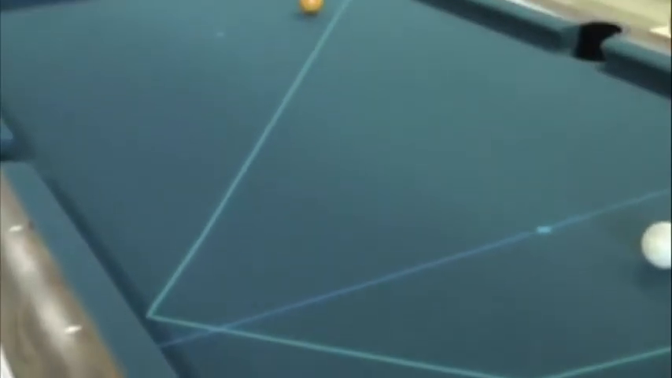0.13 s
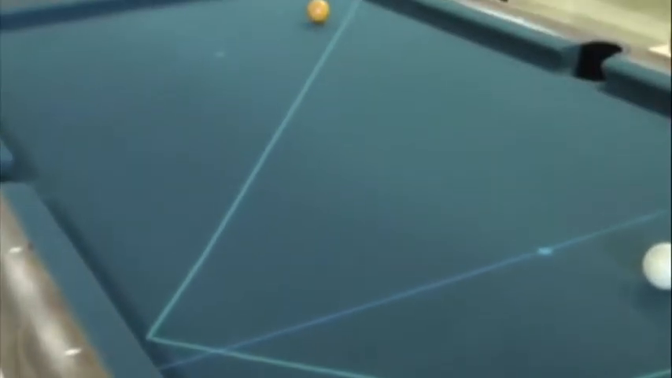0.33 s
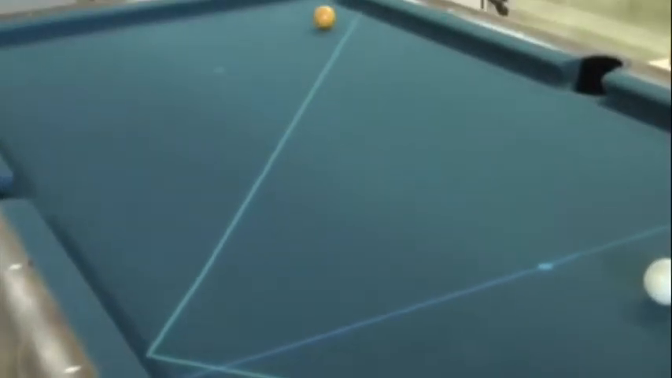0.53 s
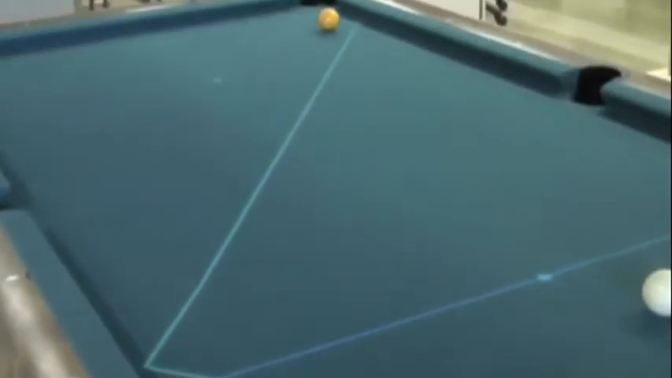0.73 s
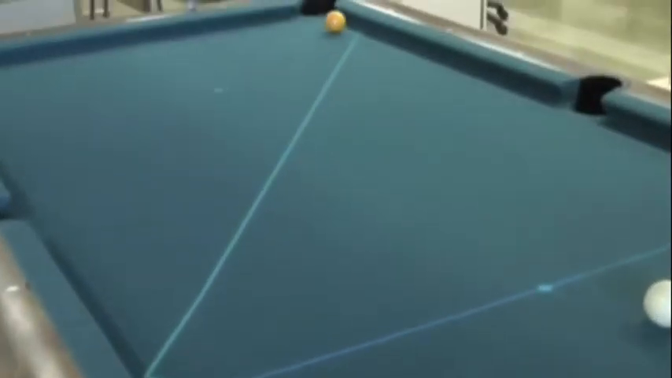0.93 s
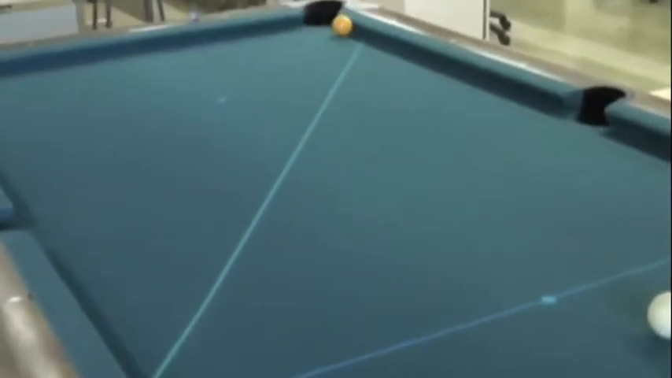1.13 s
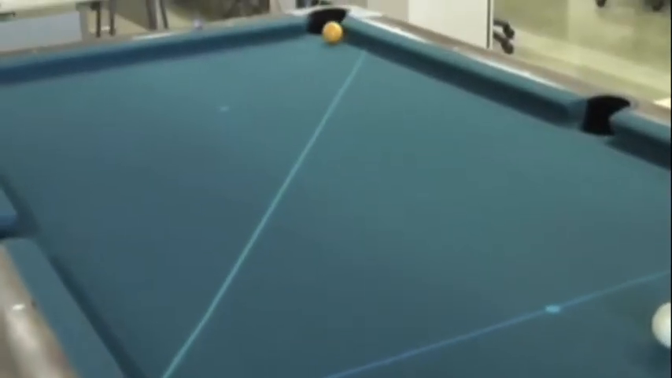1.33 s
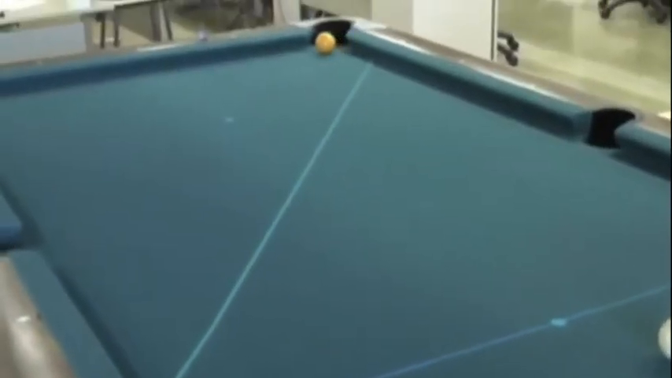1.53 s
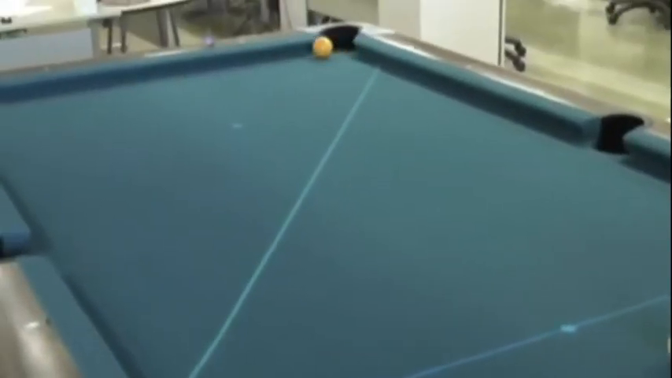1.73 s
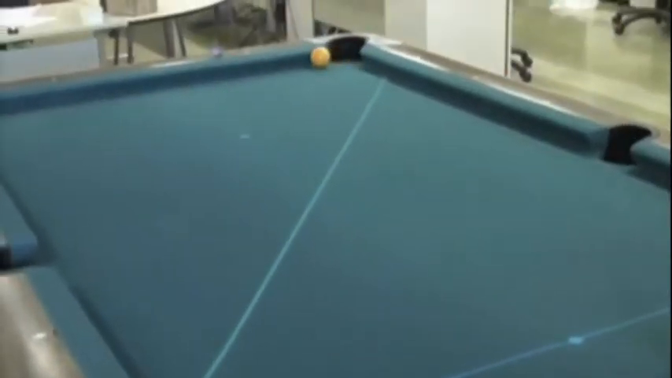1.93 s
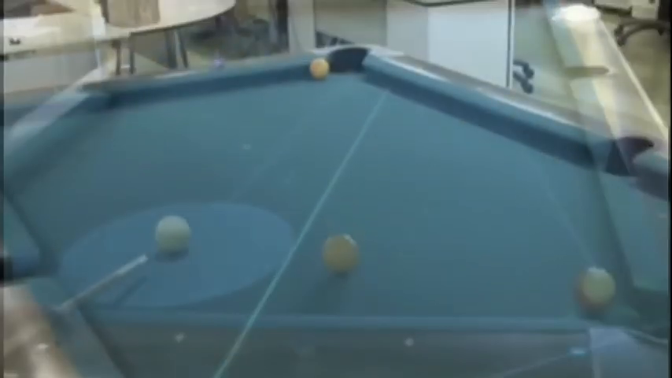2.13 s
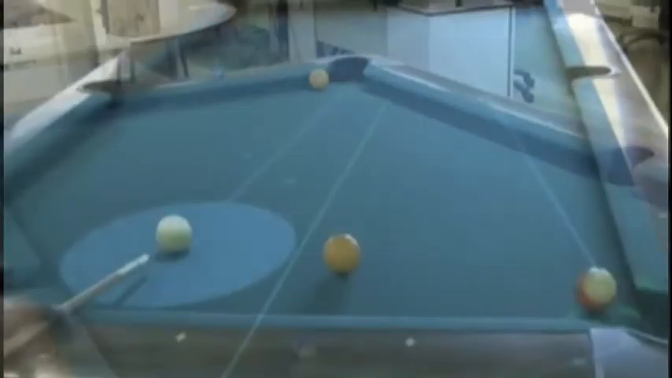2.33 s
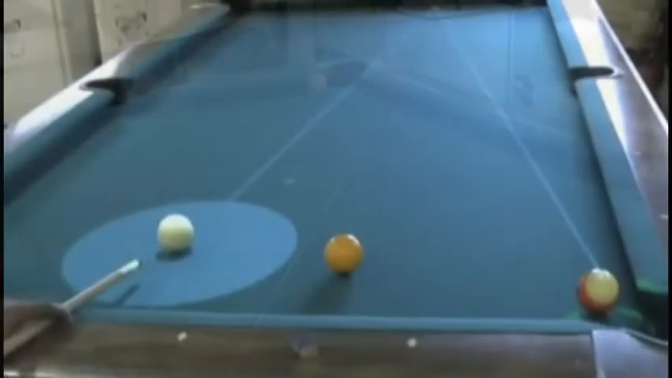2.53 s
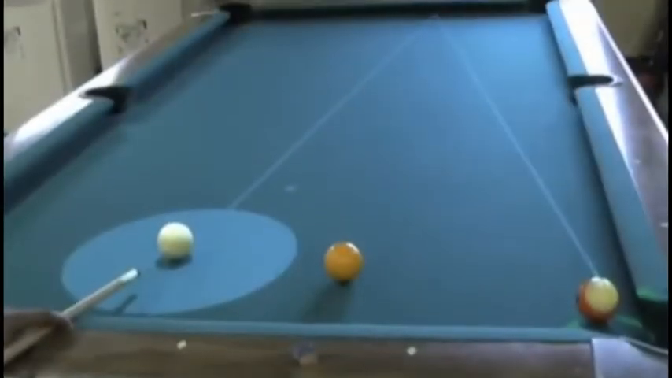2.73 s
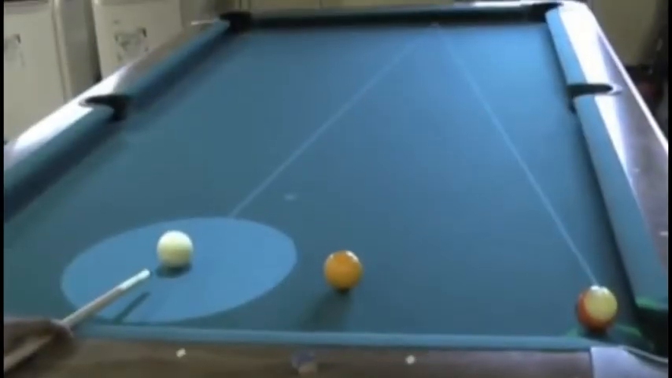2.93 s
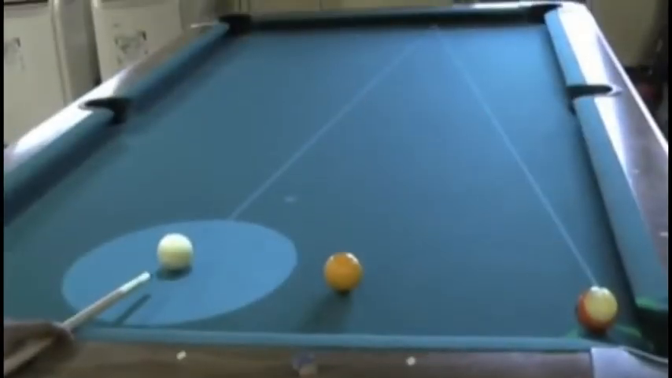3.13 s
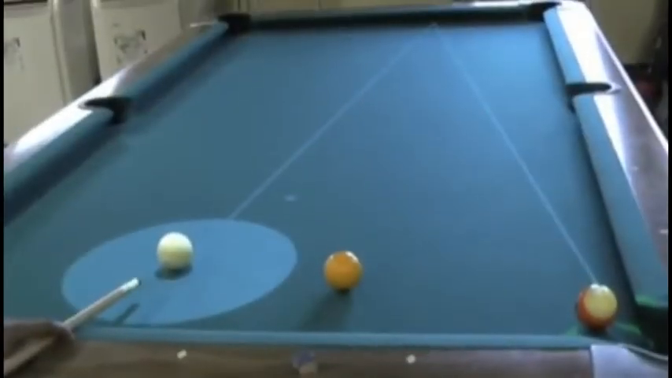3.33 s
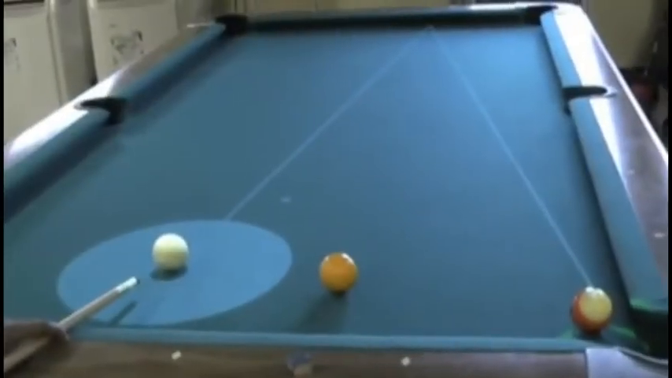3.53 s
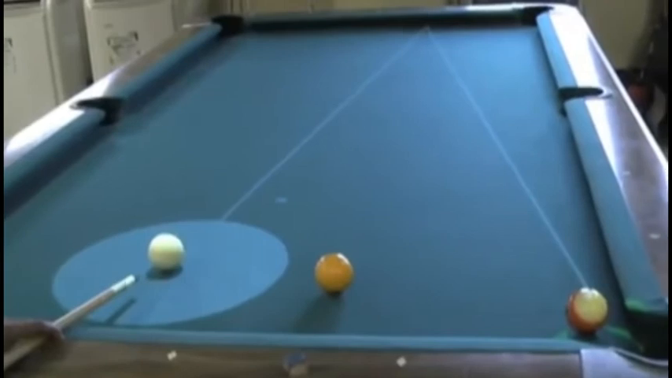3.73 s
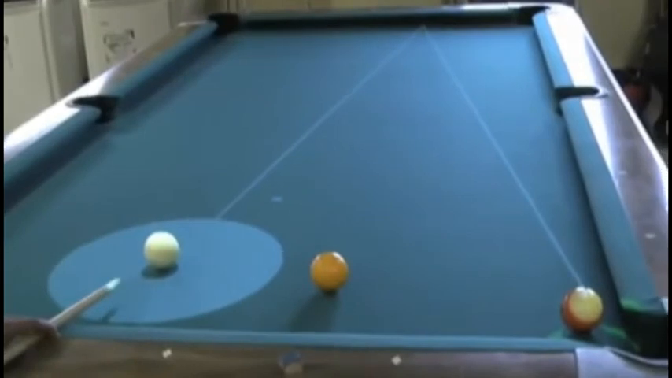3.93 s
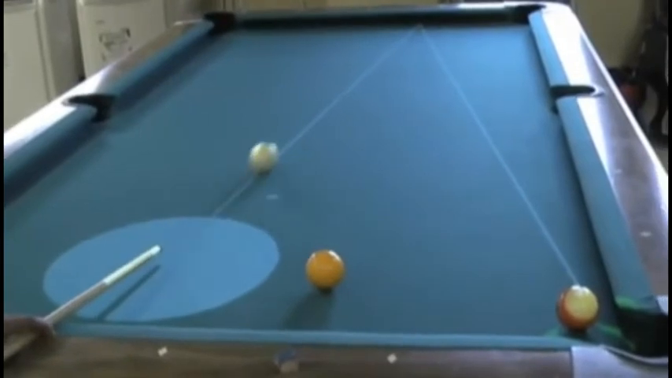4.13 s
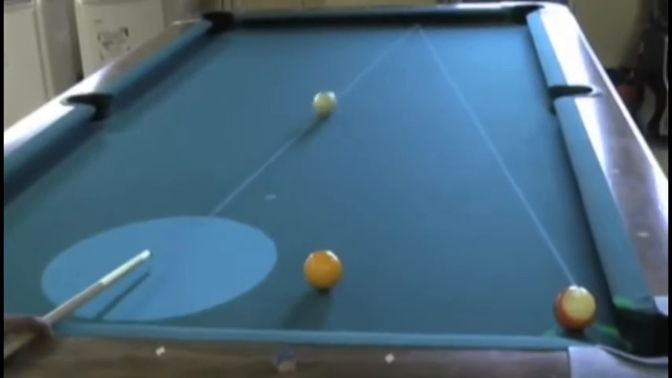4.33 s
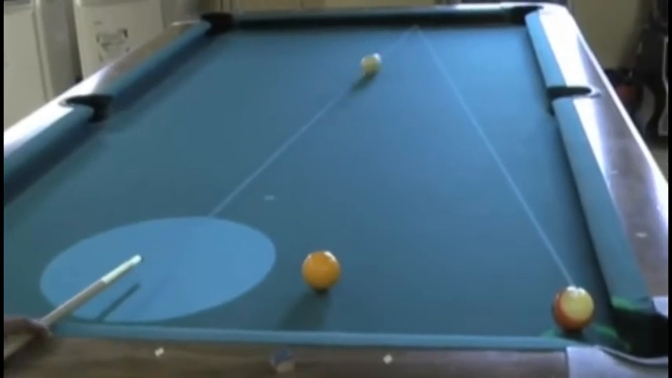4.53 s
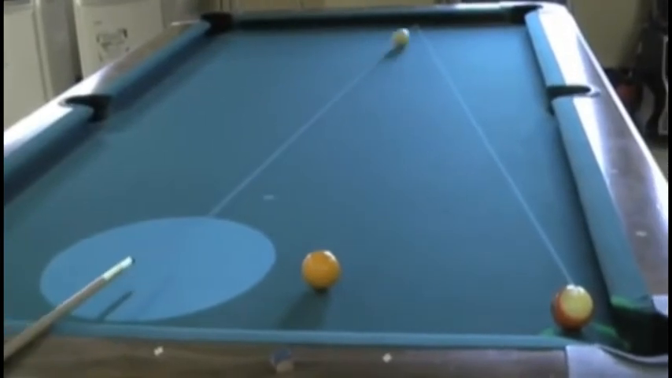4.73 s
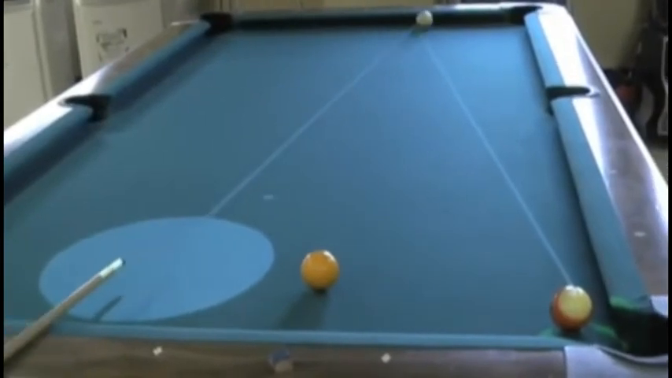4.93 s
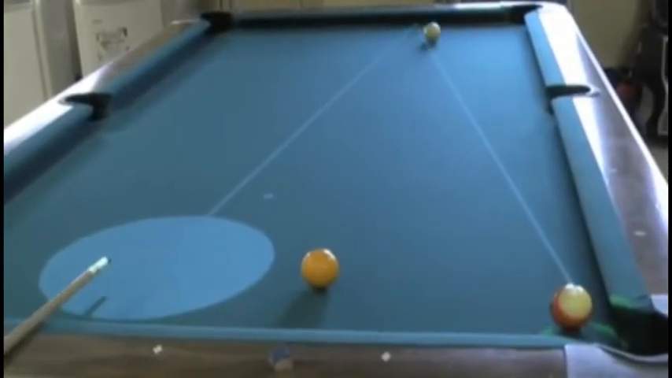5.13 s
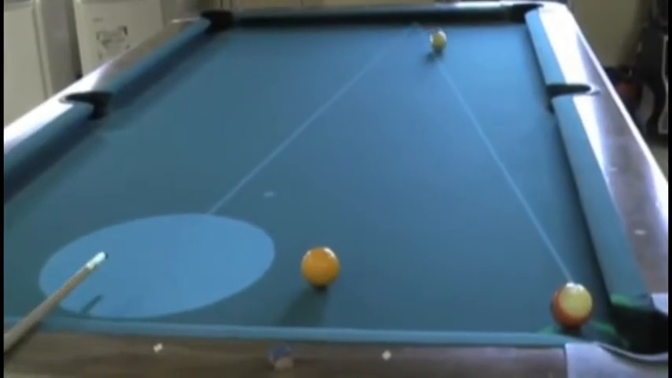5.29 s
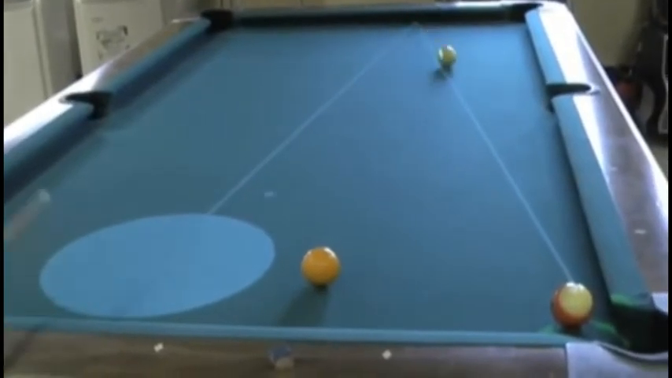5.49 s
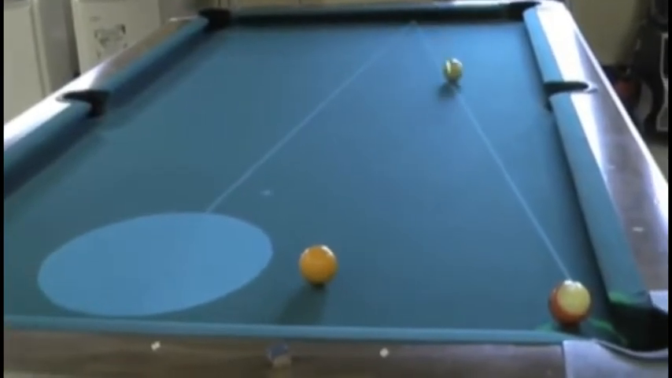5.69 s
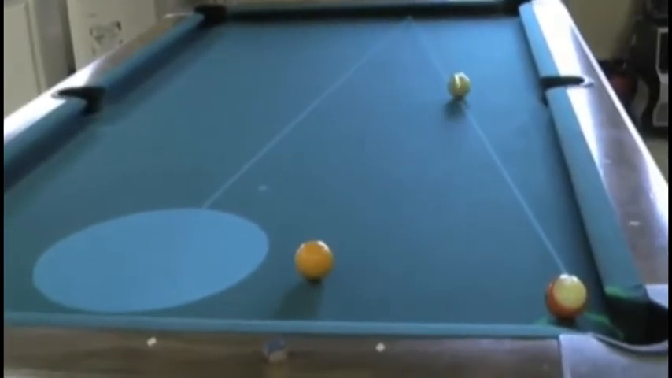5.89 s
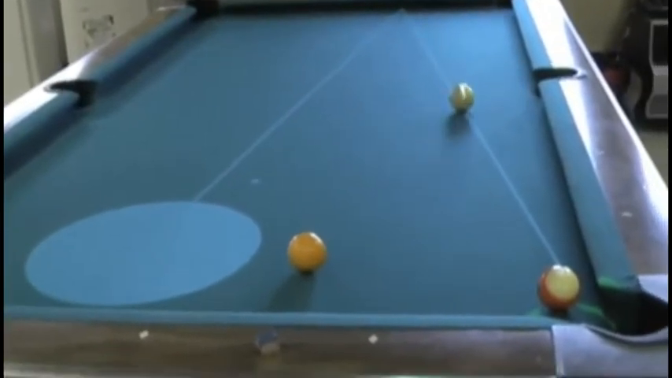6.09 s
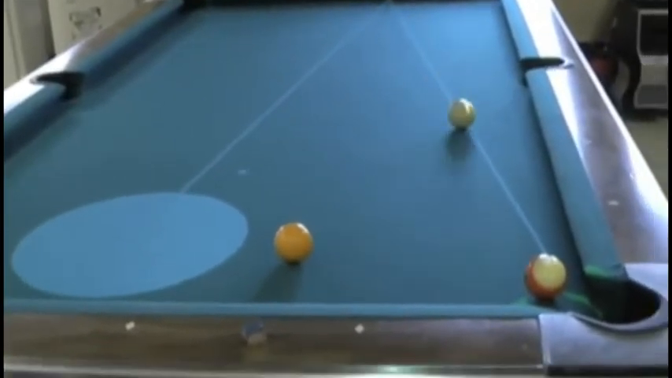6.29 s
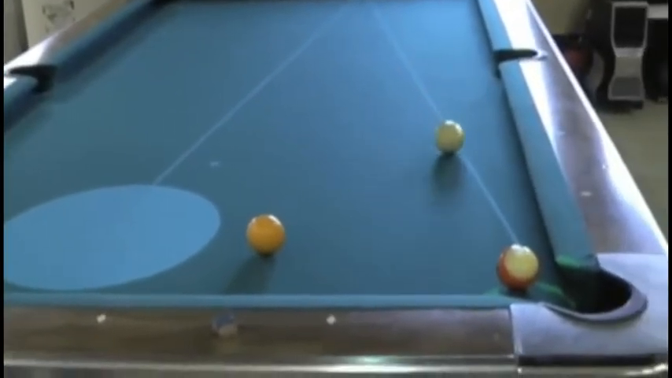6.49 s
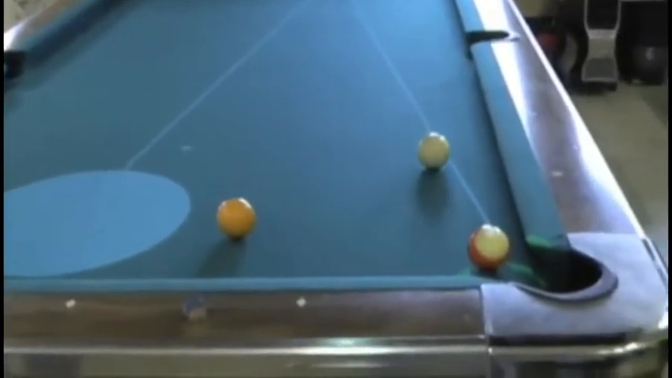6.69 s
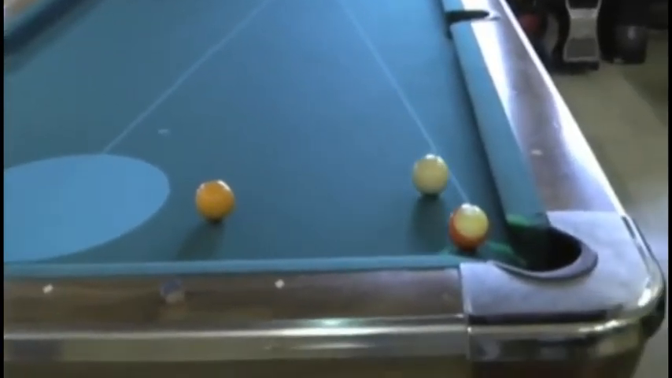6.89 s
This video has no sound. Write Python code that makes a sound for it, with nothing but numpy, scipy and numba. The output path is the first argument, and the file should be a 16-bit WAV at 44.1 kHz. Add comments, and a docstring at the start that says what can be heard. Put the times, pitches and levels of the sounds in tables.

```python
"""Pool balls clack and knock indoors; one drops into a pocket and rumbles down the wooden return.
Each blow is a burst of noise and fading tones, answered by the room; rolling is bumpy noise.
Then, in another room, a cue strikes close by and the ball rolls to the far cushion.
A shoe squeaks in gliding whistles, clothes swish and tick in shaped noise, and a fan hums throughout."""
import sys
import numpy as np
from scipy import signal
from scipy.fft import rfft, irfft, next_fast_len
from scipy.io import wavfile
from scipy.ndimage import uniform_filter1d
from numba import njit

SR = 44100
rng = np.random.default_rng(int(sys.argv[2]) if len(sys.argv) > 2 else 0)


def pcm_store(signal):
    """Save signal as 16-bit PCM."""
    levels = np.round(np.clip(np.atleast_2d(signal), -1, 1) * 32767)
    wavfile.write(sys.argv[1], SR, levels.astype(np.int16).T)


N = 306495
TIME = np.arange(N) / SR
AGE = np.arange(SR) / SR  # the second that follows a blow
TOP_HZ = 14800  # little is left above this

# A t60 is the time a sound takes to fade by 60 dB.
# moving air: (frequency [Hz], density [dB per Hz])
AIR_COLOUR = [(12, -32), (20, -41), (80, 1.5), (135, -9), (155, -6.5), (285, -1.5), (327, -11.5),
              (365, -5.5), (420, -8.5), (1050, -13.5), (1270, -16.5), (1540, -17.5), (1980, -21),
              (4000, -30), (6000, -37), (12300, -39), (14900, -57)]
AIR_DB = -54.5  # before the slow swell in FAN_SWELL
# motor and blade tones: (frequency [Hz], level before the 1 dB trim, waver and swell [dB])
FAN_TONES = [(129, -64), (285, -67), (770, -73), (937, -67.5), (1017, -67), (1497, -72.5)]
# slow changes in the fan's loudness: (time [s], gain [dB])
FAN_SWELL = [(0, 3.5), (2.1, 1.5), (2.35, 0), (2.65, 2.5)]

# small handling ticks: (time [s], level [dB])
TICKS = [(5.094, -59), (6.537, -54), (6.551, -50.5), (6.922, -58.5)]
# tone colour of a tick: (frequency [Hz], density [dB per Hz])
TICK_COLOUR = [(60, -25), (150, -17), (700, 9.5), (1700, 9.5), (3500, -3.5), (5000, -8.5), (7000, -12),
               (11000, -14), (15000, -34)]
# strokes of rubbing sole and clothes: (start [s], length [s], level [dB])
SWISHES = [(4.612, 0.073, -62.5), (4.725, 0.044, -59), (5.986, 0.082, -63), (6.054, 0.075, -53.5),
           (6.125, 0.048, -52), (6.384, 0.014, -54.5)]
# tone colour of the rubbing: (frequency [Hz], density [dB per Hz])
SWISH_COLOUR = [(100, -43), (500, -17), (2000, 4), (4000, 0.5), (6500, 0), (10000, 1.5), (12500, -4),
                (15000, -17.5)]
SWISH_ATTACK_S, SWISH_RELEASE_DB_PER_S = 0.039, 260

# the sole sticks and slips from one resonance to the next:
# (start [s], length [s], pitch [Hz], glide [Hz], level [dB], roughness [0-1])
SLIPS = [(4.659, 0.013, 8620, -480, -44.5, 0.4), (4.686, .008, 9350, -1100, -41, 0.7),
         (4.693, 0.0073, 8240, 700, -39.5, 0.66), (4.698, 0.02, 8985, 50, -34.5, 0.23),
         (4.722, 0.011, 9630, -20, -32, .22), (4.735, 0.011, 9300, 1200, -34, 0.3)]
SLIP_ATTACK_S, SLIP_RELEASE_DB_PER_S = 0.0027, 3500
SLIP_FLUTTER_HZ = 3880  # side tones lie this far below and above the whistle
# tone colour of the grinding sole: (frequency [Hz], density [dB per Hz])
RASP_COLOUR = [(2000, -25), (7500, -16), (8300, 2), (9600, 1), (10800, -6), (11700, -2), (13000, -9),
               (14500, -14)]
RASP_S, RASP_LENGTH_S, RASP_DB = 4.645, 0.084, -53
# how long the squeak echoes: (frequency [Hz], t60 [s])
SQUEAK_ECHO_T60 = [(4000, .3), (9000, 0.41), (10500, .3), (13000, 0.18)]
# tone colour of the sole's last scrape: (frequency [Hz], density [dB per Hz])
SCUFF_COLOUR = [(1000, -22), (2400, -4), (2950, 6), (3600, -3), (5000, -9), (7000, -13), (12000, -17)]
SCUFF_S, SCUFF_LENGTH_S, SCUFF_DB = 4.75, 0.041, -57

# how long the first room echoes: (frequency [Hz], t60 [s])
FIRST_ROOM_T60 = [(100, 0.84), (260, 0.69), (700, 0.37), (1800, 0.43), (5000, 0.53), (12000, 0.13)]
# how long the second room echoes: (frequency [Hz], t60 [s])
SECOND_ROOM_T60 = [(100, 1), (260, 0.59), (700, 0.25), (1800, 0.45), (5000, 0.42), (12000, 0.4)]

# tones of rail and frame on the second table: (frequency [Hz], level [dB], t60 [s])
CUSHION_MODES = [(108, -6.5, 0.54), (130, -4, 0.25), (150, -4.5, .25), (223, -3, 0.27), (299.4, -10, 0.21),
                 (408, -6.5, 0.15), (774, -7, 0.17), (1134, -16, 0.16)]
# tone colour of the cushion's thud: (frequency [Hz], density [dB per Hz])
CUSHION_THUD = [(40, -42), (65, -24), (95, -3), (125, -1.5), (220, -4.5), (420, -6.5), (800, -11.5),
                (1200, -16.5), (2000, -31), (4000, -52), (9000, -74)]
CUSHION_S = 4.859
# tones of the cue's shaft: (frequency [Hz], level [dB], t60 [s])
CUE_MODES = [(249, -10, 0.38), (369, -6, 0.38), (743, 2.5, 0.21), (850, -10, .1), (1063, -5, 0.19),
             (1260, 1.5, 0.17), (1484, 4, 0.14), (2207, -13, .2), (2509, -7.5, 0.26), (2810, -3, 0.08),
             (3280, -8, 0.18), (4070, -6, 0.12), (4900, -17, .15)]
# tone colour of the room's answer to the cue: (frequency [Hz], density [dB per Hz])
CUE_ROOM_COLOUR = [(50, -38), (105, 1), (160, -6.5), (250, -3), (390, 0.5), (560, -6), (780, -0.5),
                   (1500, -8), (1850, -12), (2600, -12.5), (3600, -16.5), (6500, -22.5), (7400, -35),
                   (11000, -34.5), (15000, -51)]
# tone colour of the cue tip's crack: (frequency [Hz], density [dB per Hz])
CUE_TICK_COLOUR = [(300, -17), (1500, 3.5), (3500, 6), (4500, 3), (6500, -0.5), (7400, -12), (11000, -13.5),
                   (12500, -21), (15000, -26)]
CUE_S, CUE_THUMP_HZ = 3.9336, 105

# the ball runs over the cloth or down the return:
# (start [s], length [s], level [dB], build-up [s], slowing [dB per s], dull above at full gain [Hz])
FIRST_ROLLS = [(-0.05, 0.42, -37.5, .036, 5, 800), (0.45, 0.21, -37, 0.035, -3.5, 1180),
               (0.66, 0.13, -44, 0.036, 13, 800), (0.963, 0.094, -36.5, 0.032, 8, 604),
               (1.468, 0.39, -28.5, 0.057, 1.5, 640), (1.89, 0.18, -33, 0.036, 24, 500),
               (2.076, 0.35, -40.5, 0.044, 24, 484)]
# runs over the second table:
# (start [s], length [s], level [dB], build-up [s], slowing [dB per s], dull above at full gain [Hz])
SECOND_ROLLS = [(3.96, 0.19, -47, .05, 12, 600), (4.21, 0.43, -45, 0.074, 1.5, 850),
                (4.655, 0.2, -43, 0.033, -1, 560), (5.304, 1.8, -61, .036, 5, 500)]
# rolling colour of the first table: (frequency [Hz], density [dB per Hz])
FIRST_ROLL_COLOUR = [(25, -32), (55, -26), (115, 1), (180, 4), (260, 4), (400, 3.5), (620, -4), (900, -11),
                     (1500, -10.5), (3000, -19), (8000, -28)]
# rolling colour of the second table: (frequency [Hz], density [dB per Hz])
SECOND_ROLL_COLOUR = [(25, -34), (65, -22), (105, 4), (150, 0), (240, 5), (400, 3), (620, -9), (1500, -14),
                      (8000, -32)]
ROLL_RELEASE_DB_PER_S = 76  # the table rings on after a run
ROLL_DULLING = 0.25  # the treble edge falls with the run's gain to this power

# tone colour of hard resin chattering: (frequency [Hz], density [dB per Hz])
RATTLE_COLOUR = [(500, -1), (2500, 6), (5000, -8), (8000, -5.5), (11000, -7.5), (13000, -22), (15000, -31)]
RATTLE_S, RATTLE_LENGTH_S, RATTLE_DB = 1.43, 0.65, -55.5  # the ball chatters in its guides
RATTLE_ATTACK_S, RATTLE_SLOWING_DB_PER_S, RATTLE_RELEASE_DB_PER_S = .01, 13, 222
# the ball nicks its guides: (time [s], level [dB])
CHIPS = [(1.645, -59), (1.799, -59.5), (2.019, -67)]

# hard resin contacts on top of the blows:
# (time [s], level [dB], ring [dB], snap [dB], room [dB])
CLACKS = [(0.1069, -28.5, -1.5, -17, -7), (0.838, -39.5, -3, -14, -10), (0.9515, -34.5, -10, -3, -3.5),
          (1.4276, -40.5, -14, -4, -6)]
# tones of a clack: (frequency [Hz], level [dB], t60 [s])
BALL_MODES = [(1249, -4, 0.17), (1450, 3, .04), (1566, 0.5, 0.18), (1620, 7.5, 0.062), (1830, -5.5, 0.11),
              (2080, -6, 0.035), (2444, -6.5, 0.12), (2650, -2, 0.038), (2910, -2, 0.042),
              (3460, -12, 0.06), (5160, -18, 0.043)]
# tone colour of a clack's echo: (frequency [Hz], density [dB per Hz])
CLACK_ECHO_COLOUR = [(400, -3.5), (1200, 2), (1650, 3.5), (2000, -9), (2700, -4), (3600, -14.5),
                     (5200, -27.5), (8000, -40), (15000, -51)]
# tone colour of resin on resin: (frequency [Hz], density [dB per Hz])
CLICK_COLOUR = [(100, -44), (1200, 13), (2800, 9), (5500, -8), (7500, -10), (10500, -15.5), (12500, -31),
                (15000, -29)]

# blows on the table: (time [s], level [dB], contact corner [Hz], bass [dB], rise [s], body t60 [s],
# hard click [dB], room [dB], ring of the struck spot [Hz], its level [dB], its t60 [s])
KNOCKS = [(-0.03, -28, 840, -8, .004, 0.22, -24, -2, 401.6, -7, 0.27),
          (0.1052, -26.5, 1500, -7, 0.0024, 0.32, -22, 1, 559, -11, 0.29),
          (0.2388, -24, 1020, 1, 0.013, 0.24, -24, -3, 329, -4, 0.24),
          (0.752, -54, 3520, -19, 0.0018, .06, -4, 7, 2890, -11, .1),
          (0.8284, -19, 1250, -4, 0.013, 0.16, -38, -3.5, 397, -5, 0.33),
          (0.929, -34.5, 2300, 4, 0.008, 0.037, -12, -11, 1500, -15, .1),
          (0.9413, -15.8, 1270, -14, 0.007, 0.077, -33, -5, 1094, -3, 0.1),
          (0.988, -23.5, 1400, 8, 0.014, 0.38, -26.5, -6, 649, -2, 0.28),
          (1.422, -17, 840, -11, 0.0073, 0.089, -25.5, -8.5, 578, 0, 0.099),
          (1.4357, -18.5, 800, -9.5, 0.002, 0.076, -34, -14, 637, -1, 0.086),
          (1.467, -24, 1200, 11, 0.003, 0.06, -20, -7.5, 381, -1, .1),
          (1.483, -17, 1120, -2.5, 0.0025, 0.041, -23, -2.5, 677, -3.5, 0.075),
          (1.511, -23.5, 1260, 5, 0.008, 0.12, -22, -1, 125.6, -6, 0.32),
          (1.585, -18.5, 740, -3.5, 0.013, 0.15, -32.5, -4.5, 564, -6.5, 0.14),
          (1.6624, -21.5, 600, 4.5, 0.005, 0.048, -44, -17, 563, -3, .08),
          (1.688, -33, 400, 6, 0.004, .04, -45, -16, 258, -1, 0.055),
          (1.711, -26, 710, 3, 0.003, 0.056, -34, -6, 346, -4, 0.11),
          (1.724, -24, 600, -1, 0.0033, 0.05, -38, -10, 337, 1, 0.11),
          (1.757, -28.5, 580, 3, 0.011, .08, -44, -6.5, 252, -6, .15),
          (1.796, -25, 606, 6, 0.004, 0.069, -42, -12, 407, -1, .14),
          (1.848, -30, 610, 3.5, 0.0062, 0.11, -27.5, -4, 348, -1, .2),
          (1.896, -35.5, 450, 5, 0.004, 0.08, -35, -8, 263, -3.5, 0.18),
          (2.019, -44.5, 3270, 28, 0.0027, 0.32, -8, -5, 224, -2, .25)]
# what the first table rings with: (frequency [Hz], level [dB], t60 [s])
TABLE_MODES = [(128.1, -13.5, 0.47), (177.7, -12, 0.38), (222.2, -12, 0.51), (260.2, -6, 0.27),
               (341.7, -9.5, 0.31), (406, -15.5, 0.2), (532, -5.5, 0.23), (564, 0.5, 0.15),
               (681, -0.5, 0.11), (796, -4.5, 0.22), (971, -9.5, 0.18), (1076, -3.5, 0.13),
               (1266, 2, 0.045), (1400, 0.5, 0.087), (1527, -14, 0.07), (1920, -10, 0.098),
               (2220, -15, 0.084)]
# its dense, short-lived resonances: (frequency [Hz], density [dB per Hz])
TABLE_WOOD = [(25, -25.5), (45, -20), (70, -6.5), (125, -1), (250, 2), (550, 2.5), (1000, 0.5),
              (1600, -1.5), (2200, -2.5), (4000, -18.5), (15000, -46)]


def undb(db):
    """Turn decibels into gain."""
    return 10 ** (np.asarray(db) / 20)


def curve(rows):
    """Read a (time, value) table at every sample."""
    times, values = np.transpose(rows)
    return np.interp(TIME, times, values)


def at_hz(points, hz):
    """Read a (frequency, value) table with octaves evenly spaced."""
    f, value = np.transpose(points)
    return np.interp(np.log(hz + 1e-6), np.log(f), value)


def filtered(x, gain):
    """Filter with the loudness gain(Hz), without sounding ahead of the input."""
    size = next_fast_len(x.shape[-1] + SR // 8, True) // 2 * 2
    hz = np.arange(size // 2 + 1) * SR / size
    # folding the cepstrum (the spectrum of the log gain) keeps the response causal
    cepstrum = irfft(np.log(gain(hz) + 1e-7))
    cepstrum[1:size // 2] *= 2
    cepstrum[size // 2 + 1:] = 0
    response = np.exp(rfft(cepstrum))
    return irfft(rfft(x, size) * response)[..., :x.shape[-1]]


def colour(x, points):
    """Shape x with a (frequency, dB) table."""
    return filtered(x, lambda hz: undb(at_hz(points, hz)))


def unit(x):
    """Scale to an average (rms) level of 1."""
    return x / np.sqrt(np.mean(x ** 2))


def unit_hit(x):
    """Scale to rms 1 over the first 40 ms."""
    return x / np.sqrt(np.mean(x[..., :SR // 25] ** 2))


def fade(t60):
    """Die away smoothly after a blow."""
    return np.exp(-np.log(1000) * AGE / np.maximum(t60, 1e-3))


def envelope(start_s, length_s, attack_s, release_db_per_s, sag_db_per_s=0):
    """Gain that rises, holds or sags for the length of a sound, then dies away."""
    age = np.maximum(TIME - start_s, 0)
    rise = np.minimum(age / max(attack_s, 1e-4), 1)
    overtime = np.maximum(age - length_s, 0)
    return rise * undb(-sag_db_per_s * age - release_db_per_s * overtime)


def walk(rate):
    """Smooth random drift of spread 1, with about `rate` new values a second."""
    k = max(int(SR / rate), 2)
    steps = np.repeat(rng.standard_normal(N // k + 1), k)[:N]
    return unit(uniform_filter1d(steps, k))


def diffuse(size):
    """Stereo white noise: the sides are alike in the bass, less so in the treble."""
    mid, side = rng.standard_normal((2, size))
    side = colour(side, [(100, -15), (500, -10.5), (1200, -8.0), (2500, -7.5), (10000, -7.5)])
    return np.array([mid + side, mid - side])


def room(t60s, build_s):
    """Reflections that build up, then die away in each octave at its own rate."""
    spectrum = rfft(diffuse(SR))
    octave = np.log2(np.clip(np.arange(SR // 2 + 1), 64, 16384))
    tail = 0
    for k in range(6, 15):  # octaves centred on 64 Hz to 16384 Hz
        band = irfft(spectrum * np.maximum(1 - abs(octave - k), 0))
        tail = tail + band * fade(at_hz(t60s, 2. ** k))
    return tail * (1 - np.exp(-AGE / build_s))


def ring(modes, scatter_db):
    """Fading tones; the struck spot sets the strength and phase of each."""
    hz, db, t60 = np.transpose(modes)[..., None]
    strength, phase, detune = rng.standard_normal((len(modes), 3)).T[..., None]
    gain = undb(db + scatter_db * strength)
    cycles = hz * (1 + 0.01 * detune) * AGE + phase
    return np.sum(gain * fade(t60) * np.sin(2 * np.pi * cycles), axis=0)


@njit
def lowpass(x, hz):
    """Soften the treble above a moving corner, for each channel."""
    y = np.empty_like(x)
    for c in range(len(x)):
        band, low = 0., 0.
        for i in range(len(hz)):
            g = np.tan(np.pi * hz[i] / SR)
            v = (band + g * (x[c, i] - low)) / (1 + g * (g + np.sqrt(2)))
            y[c, i] = low + g * v
            band, low = 2 * v - band, low + 2 * g * v
    return y


def add(out, s, sound):
    """Mix a sound into out, starting at time s."""
    start = int(s * SR)
    a, b = max(start, 0), min(start + sound.shape[-1], N)
    out[:, a:b] += sound[..., a - start:b - start]


def fan():
    """Steady moving air with a few wavering motor tones."""
    air = unit(colour(diffuse(N), AIR_COLOUR)) * undb(AIR_DB)
    hum = 0
    for hz, db in FAN_TONES:
        level = undb(db - 1 + 2.5 * walk(11))
        cycles = np.cumsum(hz + 5 * walk(40)) / SR
        hum = hum + level * unit(np.sin(2 * np.pi * cycles))
    return (air + hum) * undb(curve(FAN_SWELL))


def tick(db):
    """A light tap and its short echo."""
    tap = unit_hit(diffuse(SR) * fade(0.037))
    echo = unit_hit(room(SECOND_ROOM_T60, build_s=0.0043))
    return undb(db) * unit_hit(colour(tap + undb(1.5) * echo, TICK_COLOUR))


def swish(grain_db=1.5):
    """Fibres catch and let go: a grainy hiss with little bass."""
    hiss = colour(diffuse(N) * undb(grain_db * walk(300)), SWISH_COLOUR)
    hiss = signal.sosfilt(signal.butter(2, 1000, "high", fs=SR, output="sos"), hiss)
    power = 0
    for s, length_s, db in SWISHES:
        stroke = undb(db) * envelope(s, length_s, SWISH_ATTACK_S, SWISH_RELEASE_DB_PER_S)
        power = power + stroke ** 2
    return unit(hiss) * np.sqrt(power)


def scuff(grain_db=3):
    """The sole scrapes: a short, grainy noise, much lower than the squeak."""
    scrape = unit(colour(diffuse(N) * undb(grain_db * walk(350)), SCUFF_COLOUR))
    stroke = envelope(SCUFF_S, SCUFF_LENGTH_S, attack_s=0.04, release_db_per_s=500)
    return scrape * undb(SCUFF_DB) * stroke


def slip(s, length_s, hz, glide_hz, db, rough, wobble=0.045, chatter_db=5, under_db=-25, over_db=-25.5):
    """One thin stick-slip whistle; a fast flutter puts a weak tone below it and an unsteady one above."""
    pitch = hz + glide_hz * np.clip((TIME - s) / length_s, 0, 1)
    phase = 2 * np.pi * np.cumsum(pitch * (1 + wobble * rough * walk(1500))) / SR
    flutter = 2 * np.pi * SLIP_FLUTTER_HZ * TIME
    below = undb(under_db) * np.sin(phase - flutter)
    above = undb(over_db) * walk(1200) * np.sin(phase + flutter)
    tone = (np.sin(phase) + below + above) * undb(chatter_db * rough * walk(500))
    run = envelope(s, length_s, SLIP_ATTACK_S, SLIP_RELEASE_DB_PER_S)
    return np.sqrt(2) * tone * undb(db) * run


def squeak():
    """A quick run of slips that broadly climbs in pitch over a grainy rasp; the room blurs it into a hiss."""
    rasp = unit(colour(rng.standard_normal(N) * undb(3 * walk(500)), RASP_COLOUR))
    grind = envelope(RASP_S, RASP_LENGTH_S, attack_s=.03, release_db_per_s=1500)
    whistles = sum(slip(*row) for row in SLIPS)
    direct = whistles + undb(RASP_DB) * rasp * grind
    echo = signal.fftconvolve(direct[None], room(SQUEAK_ECHO_T60, build_s=0.0019))[:, :N]
    return undb(-1) * direct + np.std(direct) * undb(-9.5) * unit(echo)


def cushion():
    """The far rubber cushion takes the ball slowly, so rail and frame answer with a dull thud."""
    thud = unit_hit(diffuse(SR) * fade(0.15))
    echo = unit_hit(room(SECOND_ROOM_T60, build_s=0.0053))
    wood = unit_hit(colour(thud + undb(-5.0) * echo, CUSHION_THUD))
    frame = unit_hit(ring(CUSHION_MODES, scatter_db=1))
    squeeze = np.minimum(AGE / .036, 1)  # the rubber gives for 36 ms
    return undb(-30.0) * unit_hit((wood + undb(1.5) * frame) * squeeze)


def cue_strike(push_hz=800, push_s=0.00172, push_width_s=0.00097, spread_s=0.0012, pan_db=4.0):
    """The tip cracks, treble first; the ball pushes the air once, the shaft rings and the table thumps."""
    delay_s = spread_s / (1 + np.arange(SR // 2 + 1) / 5000)  # bass arrives later
    crack = unit_hit(irfft(np.exp(-2j * np.pi * np.cumsum(delay_s))))
    chalk = unit_hit(rng.standard_normal(SR) * fade(.03))
    tip = unit_hit(colour(crack + undb(-2) * chalk, CUE_TICK_COLOUR))
    push_age = AGE - push_s
    push = unit_hit(np.cos(2 * np.pi * push_hz * push_age) * np.exp(-(push_age / push_width_s) ** 2))
    shaft = unit_hit(ring(CUE_MODES, scatter_db=1))
    thump = unit_hit(np.sin(2 * np.pi * CUE_THUMP_HZ * AGE) * fade(0.6))
    direct = undb(-32) * tip + undb(-27.5) * push + undb(-29.5) * shaft + undb(-47) * thump
    sides = undb(np.array([[pan_db], [-pan_db]]) / 2)  # louder on the left
    echo = unit_hit(colour(room(SECOND_ROOM_T60, build_s=0.00061), CUE_ROOM_COLOUR))
    return direct * sides + undb(-31) * echo


def rolling(runs, spectrum, table_modes, bumpy_db, ring_db):
    """Small bumps under a rolling ball keep the table ringing; as the run's gain sinks, it dulls."""
    bumps = diffuse(N) * undb(bumpy_db * walk(35))
    modes = signal.fftconvolve(bumps, ring(table_modes, scatter_db=1)[None])[:, :N]
    rumble = unit(colour(unit(bumps) + undb(ring_db) * unit(modes), spectrum))
    power, edge = 1e-18, 0
    for s, length_s, db, build_s, slowing, edge_hz in runs:
        speed = envelope(s, length_s, build_s, ROLL_RELEASE_DB_PER_S, slowing)
        share = (undb(db) * speed) ** 2
        power = power + share
        edge = edge + share * edge_hz * speed ** ROLL_DULLING
    corner = np.clip(edge / power, 100, 5000)  # the louder run weighs more
    return lowpass(lowpass(rumble, corner), corner) * np.sqrt(power)


def rattle(grain_db=1.5, surge_db=0.8):
    """Fine, uneven chatter of hard resin running down the return, weaker as the ball slows."""
    run = envelope(RATTLE_S, RATTLE_LENGTH_S, RATTLE_ATTACK_S,
                   RATTLE_RELEASE_DB_PER_S, RATTLE_SLOWING_DB_PER_S)
    unevenness = undb(grain_db * walk(400) + surge_db * walk(45.25))
    chatter = unit(colour(diffuse(N) * unevenness, RATTLE_COLOUR))
    return chatter * undb(RATTLE_DB) * run


def chip(db):
    """One bright tick of the ball on its guides, over the rattle."""
    return undb(db) * unit_hit(colour(diffuse(SR) * fade(0.13), RATTLE_COLOUR))


def clack(db, ring_db, snap_db, room_db):
    """Resin on something hard: a quickly fading snap, a short, bright ring and its echo."""
    snap = unit_hit(colour(diffuse(SR) * fade(0.033), CLICK_COLOUR))
    contact = np.minimum(AGE / .0008, 1)
    tones = unit_hit(contact * ring(BALL_MODES, scatter_db=0.5))
    echo = unit_hit(colour(room(FIRST_ROOM_T60, build_s=0.0018), CLACK_ECHO_COLOUR))
    return undb(db) * (undb(ring_db) * tones + undb(snap_db) * snap + undb(room_db) * echo)


def knock(db, corner_hz, bass_db, rise_s, body_t60, click_db, room_db, spot_hz, spot_db, spot_t60):
    """A ball meets a rail, pocket or return: table and struck spot ring, contact clicks, room answers."""
    tail = unit_hit(room(FIRST_ROOM_T60, build_s=0.013))
    burst = unit_hit(diffuse(SR) * fade(body_t60))
    wood = unit_hit(colour(burst + undb(room_db) * tail, TABLE_WOOD))
    modes = unit_hit(ring(TABLE_MODES, scatter_db=2))
    spot = unit_hit(np.sin(2 * np.pi * spot_hz * AGE) * fade(spot_t60))
    body = wood + undb(-1.5) * modes + undb(spot_db) * spot

    def contact_gain(hz):
        """A soft, long contact cannot drive the high modes; a heavy one rocks the whole frame."""
        softness = (1 + (hz / corner_hz) ** 6.7) ** -.5
        return softness * undb(bass_db / (1 + (hz / 300) ** 2))

    body = filtered(body, contact_gain)
    click = colour(unit_hit(diffuse(SR) * fade(0.13)) + undb(-7.0) * tail, CLICK_COLOUR)
    swell = np.minimum(AGE / max(rise_s, 1e-4), 1)
    return undb(db) * (unit_hit(body * swell) + undb(click_db) * unit_hit(click * swell))


def scene():
    """Both shots over the fan, with the shoe and clothes."""
    out = fan() + swish() + scuff() + squeak() + rattle()
    out += rolling(SECOND_ROLLS, SECOND_ROLL_COLOUR, CUSHION_MODES, bumpy_db=2, ring_db=-15.5)
    out += rolling(FIRST_ROLLS, FIRST_ROLL_COLOUR, TABLE_MODES, bumpy_db=2, ring_db=-12.5)
    for s, db in TICKS:
        add(out, s, tick(db))
    add(out, CUSHION_S, cushion())
    add(out, CUE_S, cue_strike())
    for s, db in CHIPS:
        add(out, s, chip(db))
    for s, *contact in CLACKS:
        add(out, s, clack(*contact))
    for s, *blow in KNOCKS:
        add(out, s, knock(*blow))
    return out


def record(dry):
    """The recorder cuts the top steeply."""
    return signal.sosfilt(signal.ellip(8, .2, 70, TOP_HZ, fs=SR, output="sos"), dry)


dry = scene()
out = record(dry)
pcm_store(out)
```